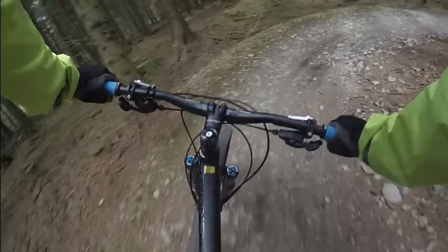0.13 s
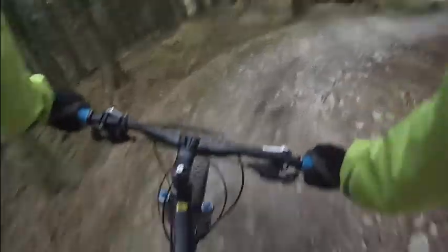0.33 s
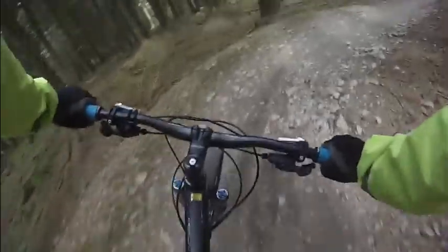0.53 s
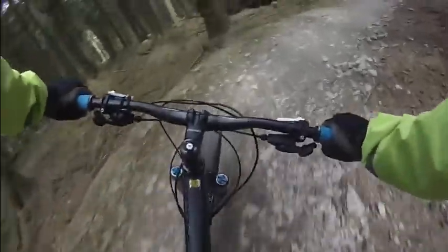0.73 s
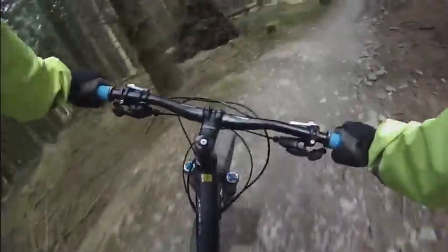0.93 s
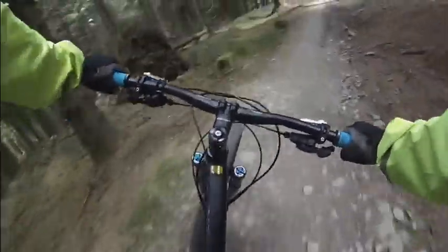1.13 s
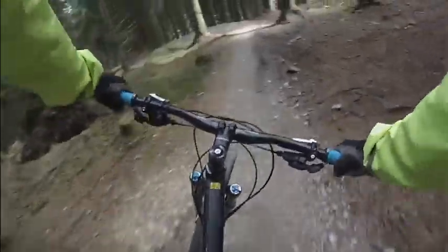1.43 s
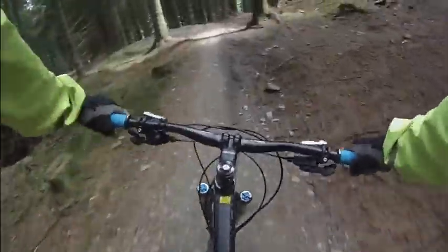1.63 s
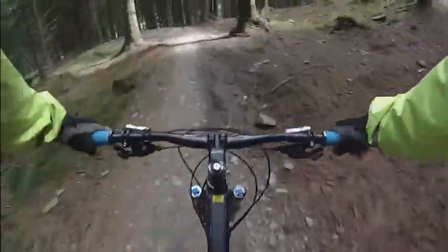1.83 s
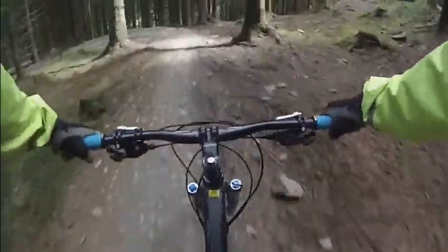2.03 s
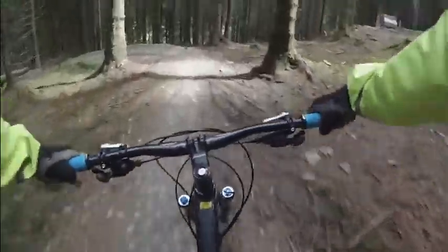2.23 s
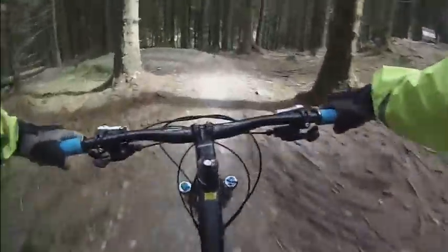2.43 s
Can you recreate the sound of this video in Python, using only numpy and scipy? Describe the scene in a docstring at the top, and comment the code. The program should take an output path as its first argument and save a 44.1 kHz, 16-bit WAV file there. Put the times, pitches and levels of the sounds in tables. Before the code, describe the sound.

A mountain bike coasts on a dirt trail, heard close from the rider's chest. Tyre hiss and stone crunch swell from 0 to 0.35 s, with a deep, booming bump near 0.29. A hard, overloaded tick hits at 0.4, then quiet low rumble. A small crunch at 1.25 leads to sharp metallic ticks at 1.31, 1.52, 1.68, 1.87, a softer 2.09, loud 2.32 and faint 2.48, with brief ringing and loose chatter.

```python
"""A mountain bike coasts down a dirt trail, heard from the rider's chest.
Tyres crunch over stones (bursts of random grains) and thud through a bump (pressure swing, boom).
A hard tick follows (short modes, struck twice); then the tyres roll on: low rumble, soft hiss (noise).
More ticks come, the loudest overloading the microphone; metal rings on (long modes) and something
loose chatters (runs of grains)."""
import sys
import numpy as np
from scipy import signal
from scipy.fft import rfft, irfft
from scipy.io import wavfile

SR = 44100
rng = np.random.default_rng(int(sys.argv[2]) if len(sys.argv) > 2 else 0)


def persist_wave(psi):
    """Save psi, clipped to +-1, as 16-bit WAV."""
    counts = np.round(np.clip(psi, -1, 1) * 32767).astype(np.int16)
    wavfile.write(sys.argv[1], SR, np.atleast_2d(counts).T)


N = 114660
TIME_S = np.arange(N) / SR

# Tyre hiss on dirt. Each row: time in seconds, rms level in dB.
HISS_LEVEL = [(0, -51.5), (.15, -51), (.25, -44.5), (.35, -39), (.41, -62.5), (.55, -65), (.75, -66),
              (.95, -63), (1.12, -56.5), (1.27, -57.5), (1.34, -67.5), (1.45, -68), (1.6, -70),
              (2.02, -74.5), (2.2, -66), (2.27, -62), (2.35, -68.5), (2.6, -67)]
# Spectrum of the hiss. Each row: frequency in Hz, relative level in dB.
HISS_COLOUR = [(150, -34.5), (250, -7), (302, -5.5), (385, -4), (420, -7), (1160, -13), (1360, -1),
               (1530, -4.5), (1790, -2.5), (1990, -5.5), (2360, -5.5), (2900, -14.5), (3220, -9),
               (12600, -35.5), (15500, -46.5)]
# Rumble of tyres and air, before its lumps. Each row: time in seconds, level in dB.
RUMBLE_LEVEL = [(0, -41), (.16, -35.5), (.23, -26), (.29, -18), (.35, -25), (.42, -41.5), (.51, -56),
                (.75, -58), (.9, -50.5), (1.0, -54), (1.15, -46.5), (1.27, -44), (1.38, -58), (1.55, -57.5),
                (1.8, -56), (2.0, -59), (2.25, -53.5), (2.42, -57.5), (2.6, -59)]
# Spectrum of the rumble. Each row: frequency in Hz, relative level in dB.
RUMBLE_COLOUR = [(15, 6), (30, 0.5), (50, -2), (80, -8.5), (120, -8), (170, -9.5), (260, -31.5), (500, -31),
                 (900, -51.5)]
# Stones crunching under the tyres. Each row: start in seconds, level before the low-pass in dB,
# decay time constant in seconds, low-pass corner in Hz.
STONES = [(0.048, -35.5, 0.0096, 3870), (0.137, -37, 0.0031, 9000), (0.172, -44, 0.0024, 8260),
          (0.187, -38, 0.0055, 10000), (0.205, -35, 0.011, 12100), (0.217, -35, 0.0024, 10100),
          (0.255, -28.5, 0.009, 13300), (0.2695, -22, 0.0025, 13100), (0.28, -25, 0.0028, 12500),
          (0.32, -25, 0.0026, 12000), (0.3244, -32, 0.0018, 12000), (0.3344, -28, .004, 12500),
          (0.349, -40, 0.011, 12360), (1.2465, -34.5, 0.011, 5150), (1.263, -64, 0.0018, 5000)]
# Spectrum of the crunch. Each row: frequency in Hz, relative level in dB.
STONE_COLOUR = [(290, -22), (500, -5.5), (577, -13), (1060, -13.5), (1510, 3), (1850, -7), (2430, 2),
                (2720, -13.5), (3240, -2), (4100, -10), (4840, -2.5), (5750, -22.5), (6270, -14),
                (12700, -26.5), (15500, -49)]
# Trail jolts that shove the microphone. Each row: centre in seconds, peak in dB, half width in seconds.
JOLTS = [(0.294, -8, 0.011), (0.452, -35.5, 0.015), (0.820, -49, 0.016), (1.194, -38, 0.018),
         (1.286, -33, 0.014), (1.721, -47.5, 0.013), (1.926, -38.5, 0.014), (2.555, -46, 0.014)]
# Tyre booms on a root or a rock. Each row: start in seconds, level in dB.
BOOMS = [(0.2766, -12), (0.321, -22.5), (0.678, -49.5), (1.262, -43), (2.246, -41.5)]
# Chatter of a loose part. Each row: start in seconds, length in seconds, level in dB.
CHATTERS = [(0.396, 0.025, -36.5), (1.553, 0.0069, -52), (1.688, 0.042, -49.5), (1.755, 0.019, -53),
            (1.879, 0.049, -45), (1.944, 0.018, -51), (2.114, 0.017, -44), (2.14, 0.037, -53.5),
            (2.518, 0.022, -46.5)]
# Spectrum of the chatter. Each row: frequency in Hz, relative level in dB.
CHATTER_COLOUR = [(250, -24), (350, -18), (460, -4.5), (620, -21), (930, 0), (1100, -6.5), (1400, 4),
                  (2100, 0), (2900, -20.5), (4100, -21.5), (4900, -19.5), (6300, -22), (8000, -42.5),
                  (15000, -52)]
# Metal that rings on after a tick. Each row: frequency in Hz, relative level in dB, T60 in seconds.
METAL_MODES = [(463, -7, .08), (920, 0, .095), (2393, 0, .085), (2848, -24, 1.1), (3052, -9, .12),
               (3205, -18, .5), (3610, -4, .13), (3838, -19, .16), (4746, -9, .15), (5109, -13, .48),
               (5265, -18, .3), (5642, -12, .12), (7235, -18, .15), (7348, -26, .4)]
# Borders in Hz between the low, main, middle and high metal modes.
RING_SPLITS_HZ = [1500, 2600, 4200]
# Short, loud modes of a knock. Each row: frequency in Hz, relative level in dB, T60 in seconds.
KNOCK_MODES = [(430, -34.5, 0.0071), (931.6, -24.5, 0.025), (1276.4, -3, .009), (1555, 4.5, 0.0074),
               (1663.3, 5.5, 0.0081), (2065, 5, 0.0055), (2295, -4, 0.0085), (2700, -19.5, 0.019),
               (3060, -27.5, 0.027), (4968, -23.5, 0.026), (4954, -15, 0.0056), (6430, -24, 0.013),
               (11000, -35.5, 0.011)]
# Hard ticks. Each row: start in seconds, strength in dB, pitch ratio, treble in dB, low modes in dB,
# rebound relative to the strike in dB, rebound delay in seconds,
# then the low, main, middle and high metal ring in dB.
TICKS = [(0.4, 11.5, 1.02, -7, -2.5, -11, .0021, -33.5, -26.5, -36, -45),
         (1.3094, 5, 1.001, 0, 6.5, -13.5, 0.0017, -31, -25.5, -46.5, -50.5),
         (1.5159, 2.65, 0.98, -1, 5, -17.5, 0.0025, -31, -25.5, -50.5, -55),
         (1.682, 8, 1.008, -6.5, -11, -17.5, .0023, -35, -25.5, -47.5, -46),
         (1.8729, 8.5, 1.007, -1, 1.5, -20, 0.0024, -41, -27, -42, -48),
         (2.085, -6.5, 0.964, -3, 3, -8.5, 0.00233, -36.5, -31.5, -57, -57),
         (2.3174, 6.5, 1.01, 2, -0.5, -9.5, .0021, -39, -26.5, -52, -50),
         (2.48, -19, 0.93, 1.5, 1.5, -12, .00206, -39, -46, -64, -60.5)]
# Light taps. Each row: start in seconds, strength in dB, pitch ratio.
TAPS = [(0.4126, -15.5, 1), (0.421, -27, 0.98), (0.7803, -40, 0.7), (1.6144, -43, 0.83), (1.763, -42, 0.85),
        (1.955, -39.5, 0.8), (2.5262, -29.5, 0.59)]

GRAIN_SPREAD_DB = 2
GRIT_PER_S, GRIT_DB = 470, -2.5  # dB relative to the tread noise
RUMBLE_LUMPS_PER_S, RUMBLE_LUMPS_DB = 22, 3
CRUNCH_GRAINS_PER_S, STONE_ATTACK_S = 2500, 0.00046
BOOM_HZ, BOOM_T60_S = 124, 0.12
CHATTER_PER_S, CHATTER_EDGE_S = 1400, 0.0035
METAL_SPREAD_DB = 4.5
LOW_BELOW_HZ, TREBLE_FROM_HZ, CONTACT_HZ = 1100, 3500, 6000
CASE_HZ, CASE_DB, CASE_T60_S = 125, -36, 0.049  # low bump of the microphone's case at each contact
THUMP_DB, THUMP_DECAY_S, THUMP_TOP_HZ = -20.5, 0.0033, 899.4  # dull, noisy body of each knock
TAP_TREBLE_DB = -6.5
OVERLOAD_TOP, OVERLOAD_KNEE = 0.93, 4.4  # full-scale ceiling, knee exponent
ROLL_OFF_HZ, CUTOFF_HZ = 13500, 15600


def from_db(db):
    """Decibels to gain."""
    return 10 ** (np.asarray(db) / 20)


def rms_one(x):
    """Scale to unit rms."""
    return x / np.sqrt(np.mean(x ** 2) + 1e-20)


def level(rows):
    """Gain over time, interpolated in dB between (s, dB) points."""
    return from_db(np.interp(TIME_S, *np.transpose(rows)))


def add(out, start_s, sound):
    """Mix a sound in at a time."""
    start = max(int(start_s * SR), 0)
    out[start:start + len(sound)] += sound


def low_pass(x, hz):
    """Soften the treble, second order."""
    sos = signal.butter(2, min(hz, SR * .45), fs=SR, output="sos")
    return signal.sosfilt(sos, x)


def coloured(x, colour):
    """Give a steady signal a spectrum, falling steeply beyond its ends; rms 1."""
    hz, db = np.transpose(colour)
    f = np.maximum(np.arange(N // 2 + 1) * SR / N, 1)
    ends = 1 / np.sqrt((1 + (hz[0] / f) ** 8) * (1 + (f / hz[-1]) ** 8))
    gain = from_db(np.interp(np.log(f), np.log(hz), db))
    return rms_one(irfft(rfft(x) * ends * gain, N))


def grains(per_s):
    """Tiny contacts at random times, of uneven size and random sign; rms 1."""
    size_db = GRAIN_SPREAD_DB * np.minimum(rng.exponential(1, N), 4)
    sizes = from_db(size_db) * rng.choice([-1, 1], N)
    return rms_one(sizes * (rng.random(N) < per_s / SR))


def ring(age_s, hz, t60_s):
    """A dying sine."""
    decay = np.exp(-np.log(1000) * np.minimum(age_s / t60_s, 10))
    return np.sin(2 * np.pi * hz * age_s) * decay


def tyres():
    """Gritty hiss of the tread over a low rumble that swells unevenly with the ground."""
    tread = rng.standard_normal(N) + from_db(GRIT_DB) * grains(GRIT_PER_S)
    hiss = level(HISS_LEVEL) * coloured(tread, HISS_COLOUR)
    lumps_s = np.arange(0, N / SR, 1 / RUMBLE_LUMPS_PER_S)
    lumps_db = RUMBLE_LUMPS_DB * rng.uniform(-2, 1, len(lumps_s))
    lumps = level(np.c_[lumps_s, lumps_db])
    rumble = coloured(rng.standard_normal(N), RUMBLE_COLOUR)
    return hiss + level(RUMBLE_LEVEL) * lumps * rumble


def stones():
    """Each stone gives a crunch, dull or bright, that starts fast and dies away."""
    crunch = coloured(grains(CRUNCH_GRAINS_PER_S), STONE_COLOUR)
    out = np.zeros(N + SR)
    for start_s, db, decay_s, top_hz in STONES:
        start = int(start_s * SR)
        near = slice(max(start - SR // 100, 0), start + SR // 10)
        age_s = TIME_S[near] - start_s
        envelope = np.exp(-np.maximum(-age_s / STONE_ATTACK_S, age_s / decay_s))
        dulled = low_pass(low_pass(crunch[near], top_hz), top_hz)
        out[near] += from_db(db) * envelope * dulled
    return out[:N]


def bumps():
    """A jolt is one deep pressure swing with soft opposite shoulders; a struck tyre booms briefly."""
    out = np.zeros(N)
    for start_s, db in BOOMS:
        out += from_db(db) * ring(np.maximum(TIME_S - start_s, 0), BOOM_HZ, BOOM_T60_S)
    for centre_s, db, half_width_s in JOLTS:
        away = ((TIME_S - centre_s) / half_width_s) ** 2
        out -= from_db(db) * (1 - away) * np.exp(-np.minimum(away, 100) * .5)
    return out


def chatter():
    """A loose part makes short runs of dense little contacts, with soft edges."""
    gate = np.zeros(N)
    for start_s, length_s, db in CHATTERS:
        outside_s = np.maximum(np.maximum(start_s - TIME_S, TIME_S - start_s - length_s), 0)
        gate += from_db(db) * np.exp(-outside_s / CHATTER_EDGE_S)
    return gate * coloured(grains(CHATTER_PER_S), CHATTER_COLOUR)


def metal():
    """Every hard tick excites two-pole resonators, with its own mix of low, main, middle and high modes."""
    rows = np.array(TICKS)
    at, ring_db = (rows[:, 0] * SR).astype(int), rows[:, -4:]
    shares_db = METAL_SPREAD_DB * rng.standard_normal((len(TICKS), len(METAL_MODES)))
    out = np.zeros(N)
    for (hz, mode_db, t60_s), share_db in zip(METAL_MODES, shares_db.T):
        band = np.searchsorted(RING_SPLITS_HZ, hz)
        blows = np.full(N, 1e-18)  # tiny floor, inaudible
        blows[at] = from_db(ring_db[:, band] + mode_db + share_db)
        radius = np.exp(-np.log(1000) / (t60_s * SR))
        angle = 2 * np.pi * hz / SR
        poles = [1, -2 * radius * np.cos(angle), radius * radius]
        out += signal.lfilter([0, np.sin(angle)], poles, blows)
    return out


def knock(db, pitch, treble_db=0, low_db=0):
    """One contact: short modes of alternating sign, strongest near 2 kHz, a dull thump, a low case bump."""
    age_s = TIME_S[:SR // 10]
    out = -from_db(CASE_DB) * ring(age_s, CASE_HZ, CASE_T60_S)
    for k, (hz, mode_db, t60_s) in enumerate(KNOCK_MODES):
        colour_db = treble_db * (hz > TREBLE_FROM_HZ) + low_db * (hz < LOW_BELOW_HZ)
        mode_hz = hz * (pitch if hz > LOW_BELOW_HZ else 1)  # low modes keep their pitch
        out += (-1) ** k * from_db(mode_db + colour_db) * ring(age_s, mode_hz, t60_s)
    thump = rng.standard_normal(len(age_s)) * np.exp(-age_s / THUMP_DECAY_S)
    out += from_db(THUMP_DB) * low_pass(thump, THUMP_TOP_HZ)
    return from_db(db) * low_pass(out, CONTACT_HZ)


def ticks():
    """A hard tick strikes and rebounds at once, which colours it; a light tap touches only once."""
    out = np.zeros(N + SR)
    for start_s, db, pitch, treble_db, low_db, rebound_db, rebound_s, *_ in TICKS:
        add(out, start_s, knock(db, pitch, treble_db, low_db))
        add(out, start_s + rebound_s, knock(db + rebound_db, pitch, treble_db, low_db))
    for start_s, db, pitch in TAPS:
        add(out, start_s, knock(db, pitch, TAP_TREBLE_DB))
    return out[:N]


def scene():
    """All sources summed, close and in the open air: one channel, no reverberation."""
    return (tyres() + stones() + bumps() + chatter() + metal() + ticks())[None]


def record(dry):
    """The loudest ticks overload the input; the treble rolls off and the top is cut."""
    clipped = dry / (1 + np.abs(dry / OVERLOAD_TOP) ** OVERLOAD_KNEE) ** (1 / OVERLOAD_KNEE)
    cut = signal.ellip(10, .1, 80, CUTOFF_HZ, fs=SR, output="sos")
    return signal.sosfilt(cut, low_pass(clipped, ROLL_OFF_HZ))


dry = scene()
out = record(dry)
persist_wave(out)
```